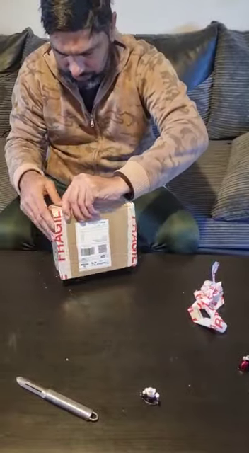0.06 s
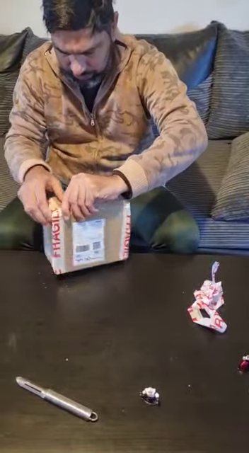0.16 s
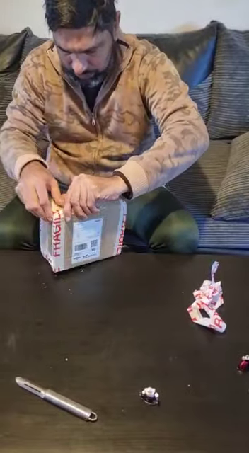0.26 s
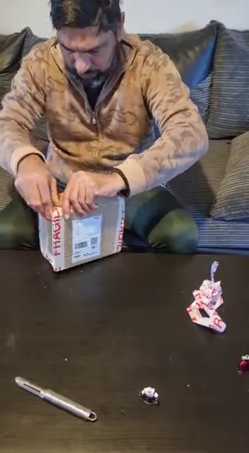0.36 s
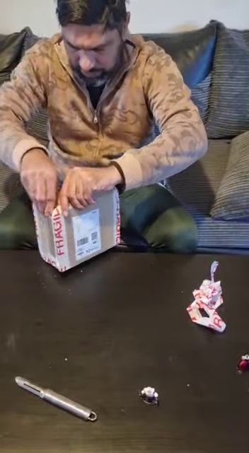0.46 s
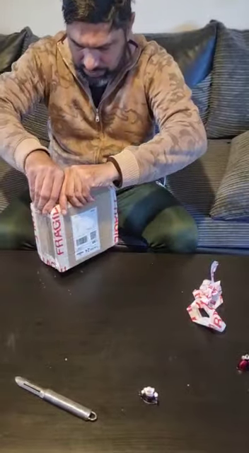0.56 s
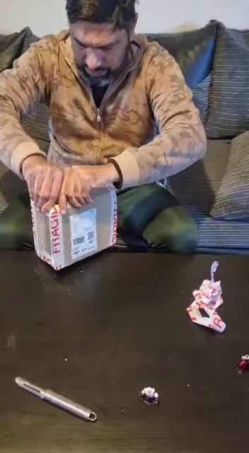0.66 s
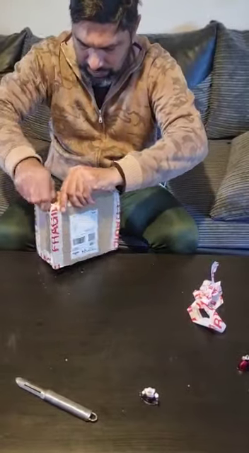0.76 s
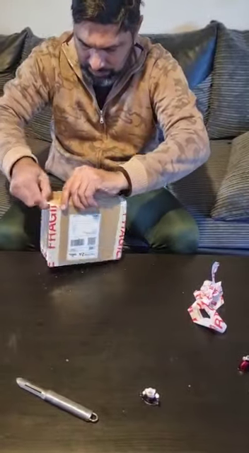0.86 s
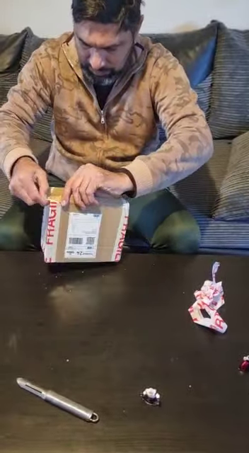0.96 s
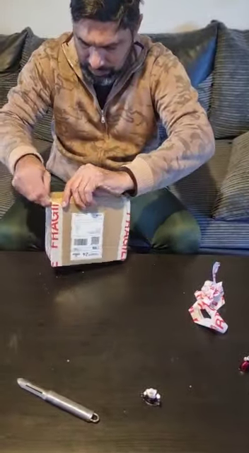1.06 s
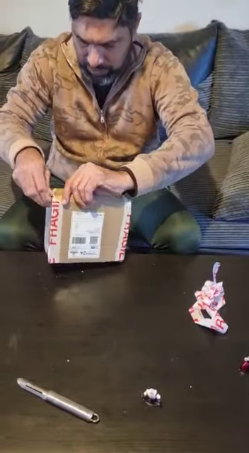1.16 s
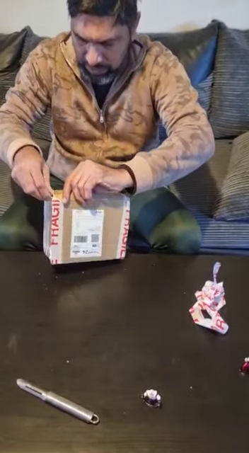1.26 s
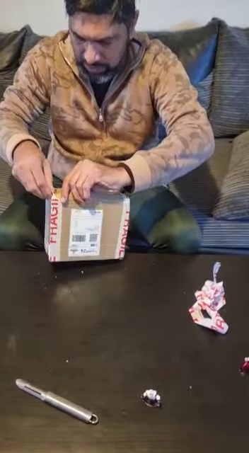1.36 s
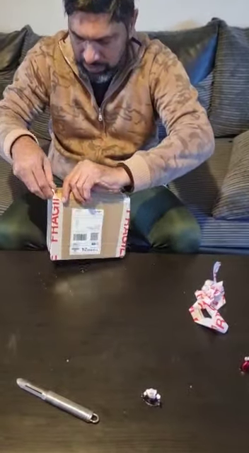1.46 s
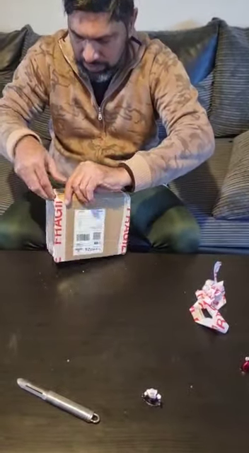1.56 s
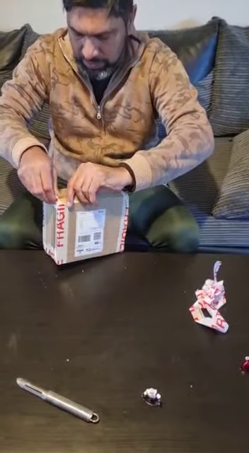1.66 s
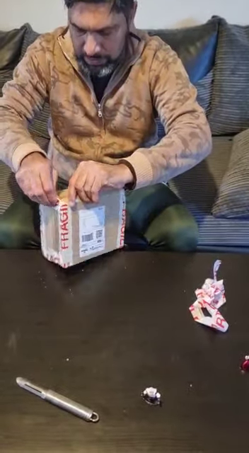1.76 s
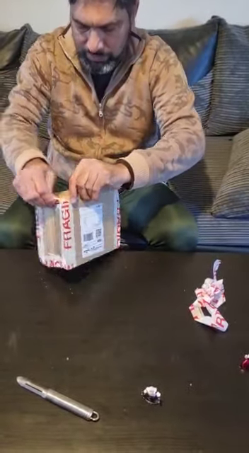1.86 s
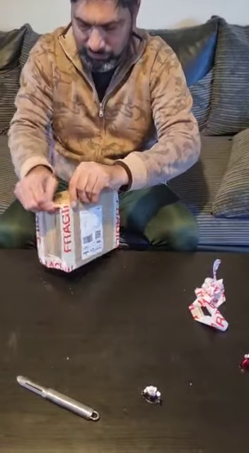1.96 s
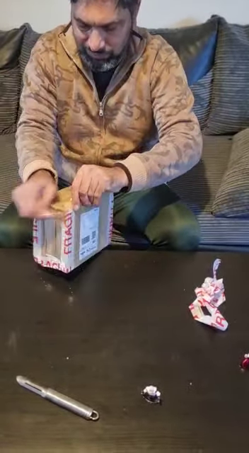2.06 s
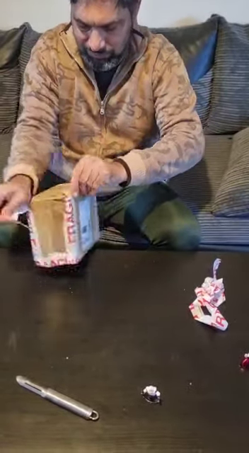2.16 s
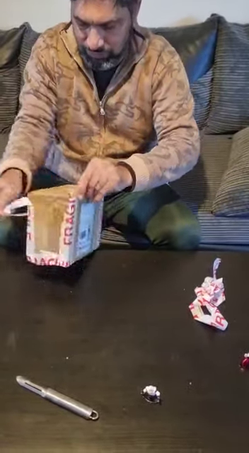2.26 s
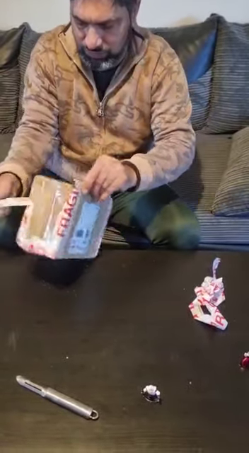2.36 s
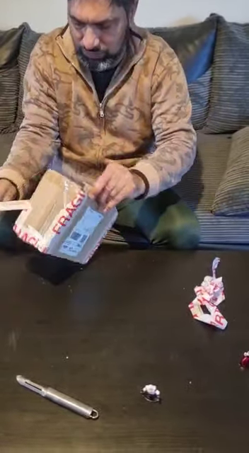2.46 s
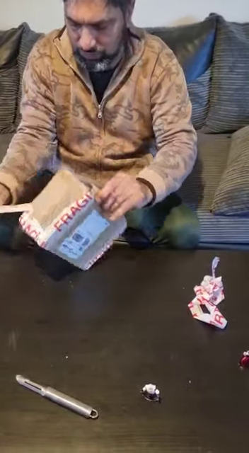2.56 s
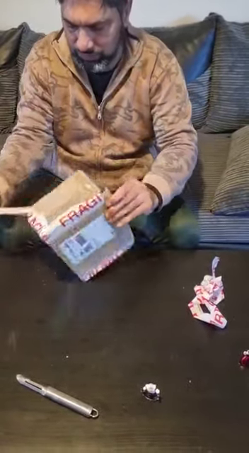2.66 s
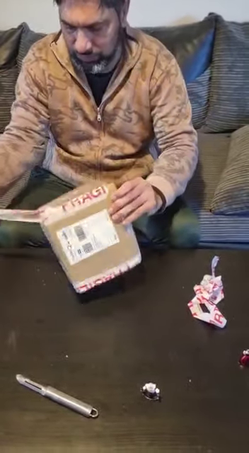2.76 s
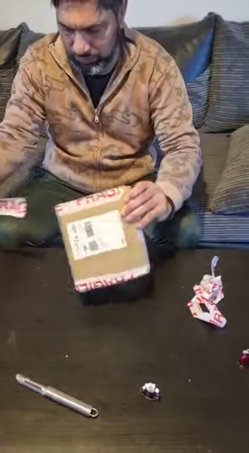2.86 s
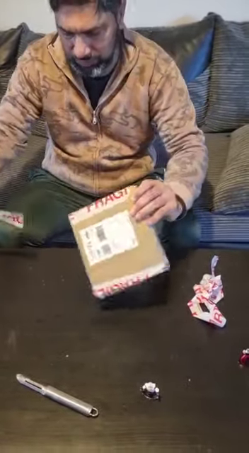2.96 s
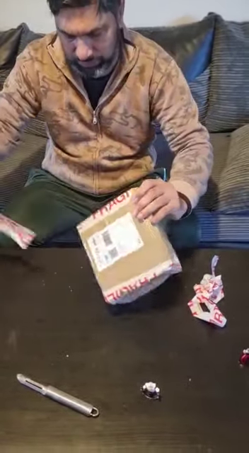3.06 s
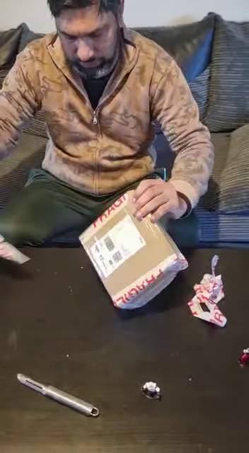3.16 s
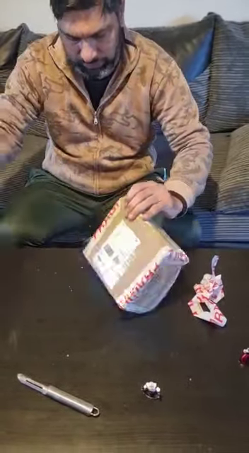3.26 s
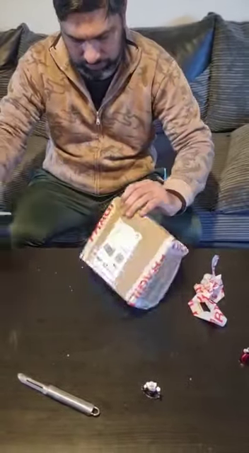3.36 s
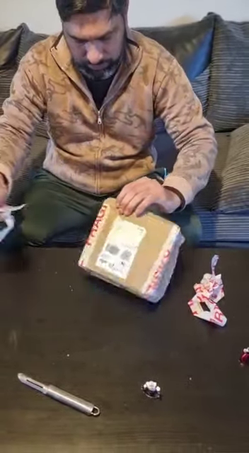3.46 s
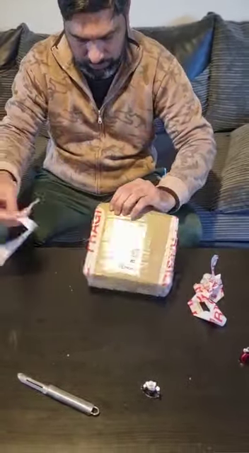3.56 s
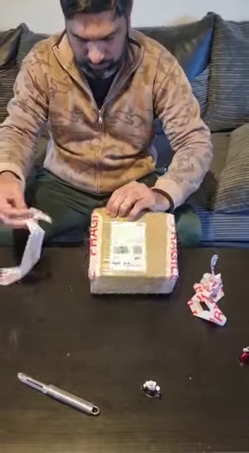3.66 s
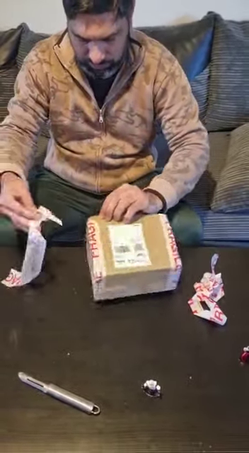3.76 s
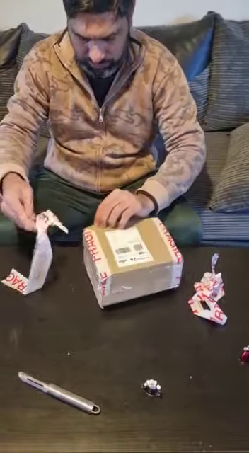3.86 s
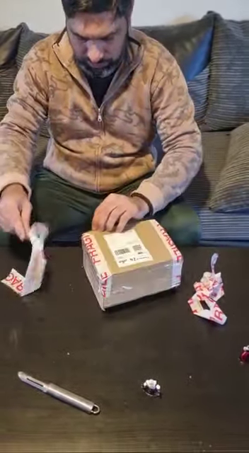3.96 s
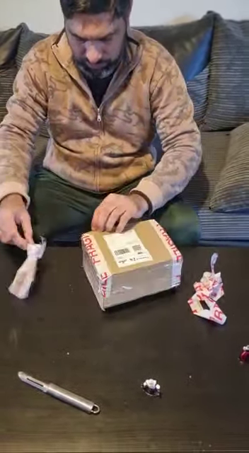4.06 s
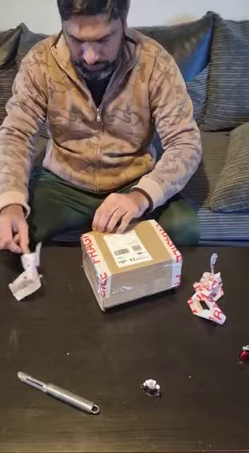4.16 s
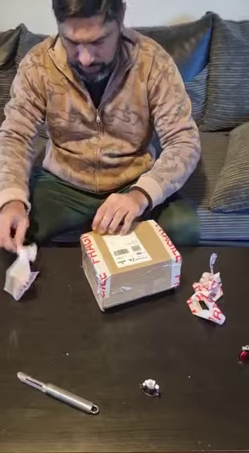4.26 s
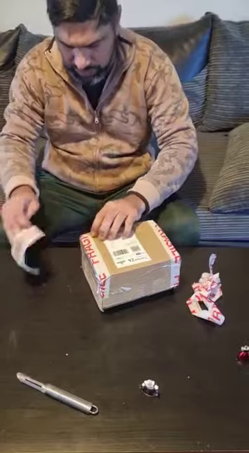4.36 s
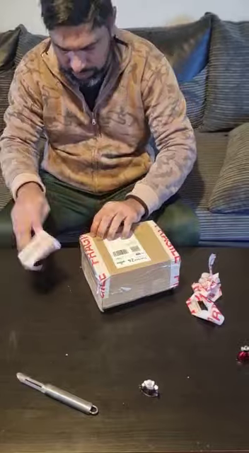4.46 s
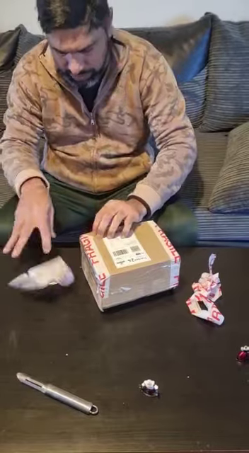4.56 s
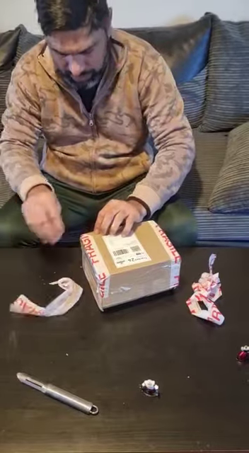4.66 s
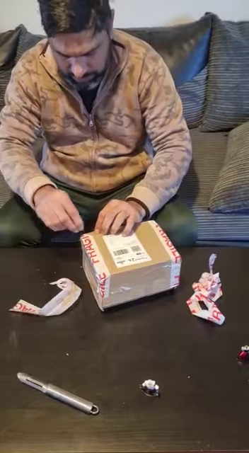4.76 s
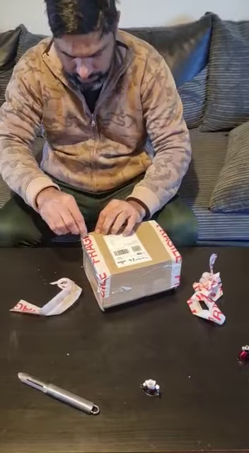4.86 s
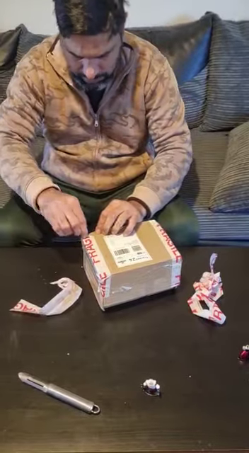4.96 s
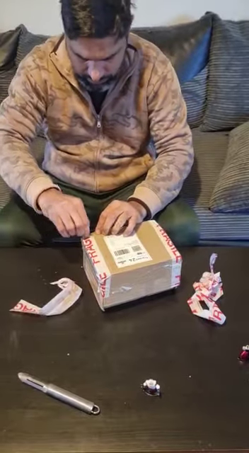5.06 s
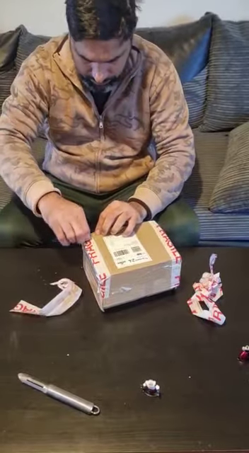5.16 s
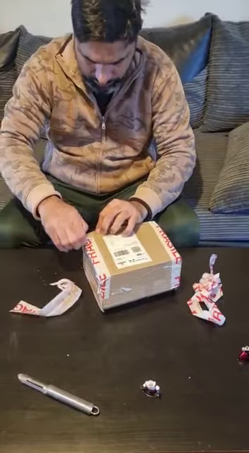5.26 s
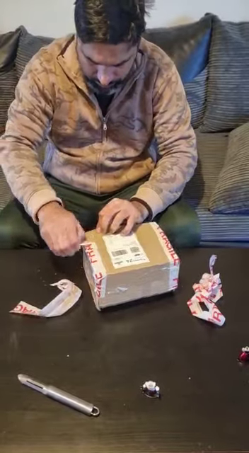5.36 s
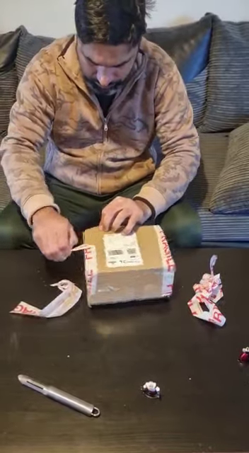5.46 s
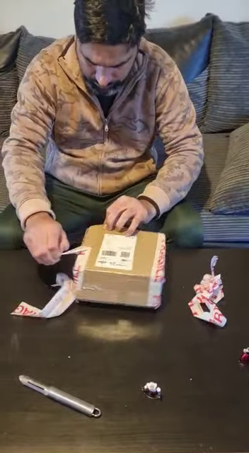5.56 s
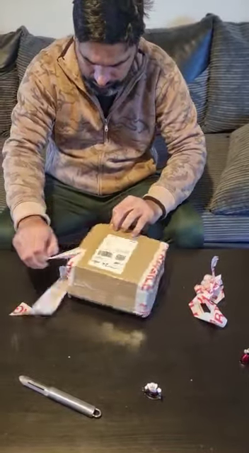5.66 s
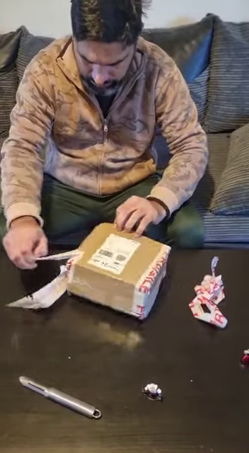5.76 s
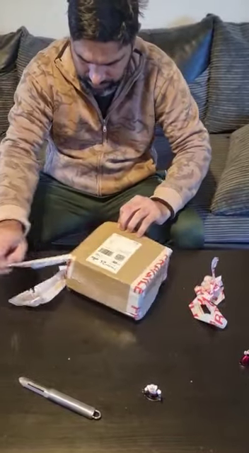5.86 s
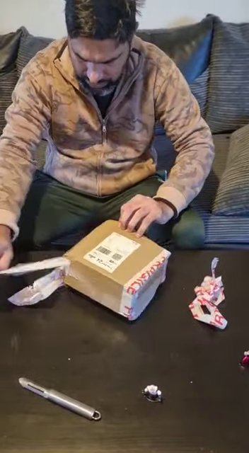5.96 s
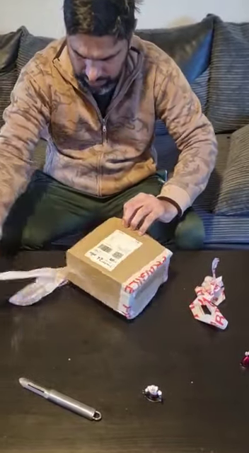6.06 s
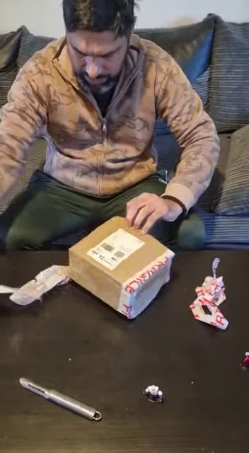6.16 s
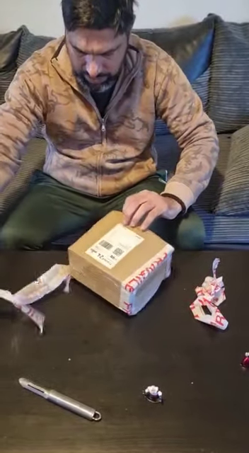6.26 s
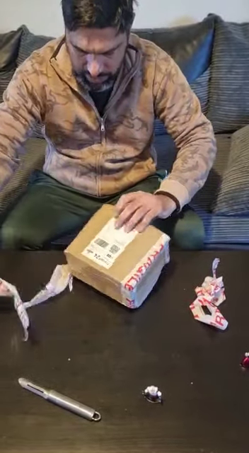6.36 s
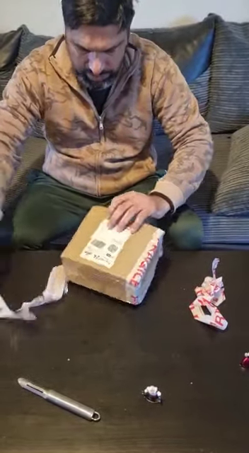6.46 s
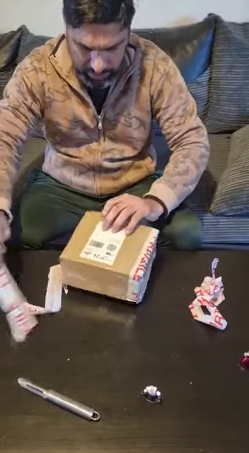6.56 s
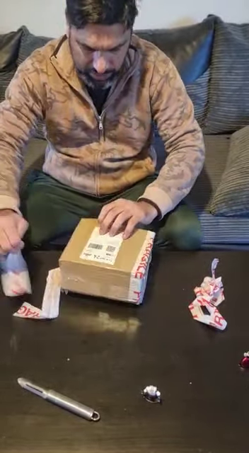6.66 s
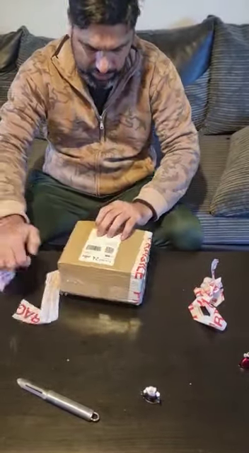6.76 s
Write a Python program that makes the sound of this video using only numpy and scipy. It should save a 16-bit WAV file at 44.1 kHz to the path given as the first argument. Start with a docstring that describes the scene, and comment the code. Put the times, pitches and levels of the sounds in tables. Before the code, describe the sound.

Close up in a small furnished room, fingers pick at tape on a cardboard box with small snaps and soft knocks. A loud sharp rip follows at two seconds, another near three, then quiet handling, a soft thud on the wooden table and faint pats. Late on, several crackling pulls build to a bright hard rip near six seconds, fading into rustle.

```python
"""Packing tape is picked at, ripped and peeled off a cardboard box: the glue lets go in tiny slips, noise bursts
that crackle in the film and drum the hollow box; snaps and ticks are short puffs, some with a ringing crease.
The box knocks and slides on a wooden table, heard as decaying modes; a hand pats the cardboard, a dull note.
A small furnished room answers with decaying noise over a faint room tone; a phone with two microphone ports,
placed close by, listens."""
import sys
import numpy as np
from scipy import signal
from scipy.fft import rfft, irfft, next_fast_len
from scipy.io import wavfile
from scipy.ndimage import uniform_filter1d, map_coordinates

SR = 44100
rng = np.random.default_rng(int(sys.argv[2]) if len(sys.argv) > 2 else 0)


def log_audio(samples):
    """Write samples as a 16-bit WAV file to the path given in sys.argv[1]."""
    # one column per channel
    frames = np.atleast_2d(samples).T
    # limit to full scale, then quantise
    limited = np.clip(frames, -1, 1)
    pcm = np.round(limited * 32767).astype(np.int16)
    wavfile.write(sys.argv[1], SR, pcm)


N = 300321

# colour of the crackling film: hz, relative level_db
FILM_COLOUR = [(120, -28), (300, -20.5), (500, -14.5), (1300, 1), (2140, 1), (3300, 0.5), (5300, -5),
               (7000, -8.5), (9000, -53)]
# colour of the sizzle in the treble: hz, relative level_db
SIZZLE_COLOUR = [(5000, -9.5), (8300, -15.5), (10500, -7), (13000, -2.5), (16000, 1.5)]
# each pull on the tape, or scuff of a hand: peak_s, rise_s, hold_s, crackle_db, box_db (drumming re crackle),
# sizzle_db (re crackle), box_note_hz, film_note_hz, film_note_db (lift of that note)
PULLS = [(0.126, 0.056, 0.017, -38.5, -9, -18, 508, 1880, 9),
         (0.574, 0.064, 0.11, -34, -1.5, 2.5, 597, 2920, 0),
         (0.771, 0.73, 0.045, -39.5, -6, 3, 764, 3750, 3),
         (0.872, 0.33, 0.11, -46.5, -6.5, 6.5, 865, 4100, 12),
         (1.437, 0.17, 0.028, -50, 2, -15, 635, 1890, 14.5),
         (1.553, 0.17, 0.0083, -43, -28, -7, 600, 1730, 8),
         (1.755, 0.095, 0.064, -44, 3.5, -3.5, 700, 1710, 6.5),
         (1.874, 0.2, 0.021, -42.5, -0.5, -4, 600, 1866, 16.5),
         (2.001, 0.053, 0.098, -41, -6.5, 12, 568, 2500, -2),
         (2.103, 0.024, 0.053, -19, -9.5, 4.5, 538, 3080, 2), (2.33, 1, 0.062, -36, -5, 0, 561, 1900, -2),
         (2.424, 0.39, 0.1, -41.5, 7.5, 1.5, 553, 2470, 6),
         (2.536, 0.33, 0.18, -41, 3, 0.5, 603, 1520, 9.5), (2.7, 0.2, 0.058, -31, -3, 1.5, 626, 2570, -4),
         (2.81, 0.073, 0.0063, -17.5, -2, 5, 885, 3000, -1.5),
         (3.328, 0.29, 0.17, -50, -3, -9, 850, 2120, 8), (3.82, 0.97, 0.24, -56, -2.5, -12, 820, 1930, 10),
         (4.118, 0.42, 0.0057, -51, -8.5, 3.5, 736, 2060, -14),
         (4.348, 0.031, 0.073, -52, -2, 0, 677, 1900, -3), (5.298, 0.038, 0.024, -44, -1, -7, 460, 4440, 9),
         (5.355, .08, 0.072, -53, 6, -13, 480, 2060, 11), (5.453, 0.47, 0.047, -34, -3, -2, 520, 2300, 5.5),
         (5.548, 0.074, 0.054, -26, 0.5, 1.5, 550, 4380, 7),
         (5.633, 0.19, 0.083, -25, -1.5, 2, 390, 4350, 3), (5.764, 0.02, 0.1, -30, -2, 0, 420, 4040, 2),
         (5.812, 0.05, 0.097, -24.5, -4.5, 2, 745, 5250, 7),
         (5.989, 0.023, 0.027, -13.5, -35, -10.5, 986, 2140, 17.5),
         (6.014, 0.083, 0.028, -27, 2.5, 12.5, 1010, 4370, -1.5),
         (6.37, 0.31, 0.0059, -43.5, -18, -1.5, 816, 3980, 5.5),
         (6.551, 0.089, 0.14, -50, -7, -3.5, 758, 4070, 4),
         (6.697, 0.29, 0.017, -44, -5, 0.5, 775, 4100, -3)]


def amp(db):
    """Gain of a level in dB."""
    return 10 ** (np.asarray(db) / 20)


def unit(x):
    """Scaled to rms 1."""
    return x / np.sqrt(np.mean(x ** 2) + 1e-20)


def along(points, hz):
    """Reads a curve of (Hz, value) points on a log frequency axis."""
    f, v = np.transpose(points)
    return np.interp(np.log(hz + 1), np.log(f + 1), v)


def filtered(x, response):
    """x times a complex response of frequency."""
    m = next_fast_len(N + SR // 2)
    return irfft(rfft(x, m) * response(np.fft.rfftfreq(m, 1 / SR)), m)[..., :N]


def coloured(x, points):
    """x through a spectrum of (Hz, dB) points."""
    return filtered(x, lambda hz: amp(along(points, hz)))


def wobble(rate):
    """A smooth random curve, rate knots a second."""
    knots = rng.standard_normal(int(N * rate / SR) + 4)
    return map_coordinates(knots, [np.arange(N) * rate / SR])


def steady(x, s):
    """x divided by its own running rms over s seconds."""
    power = uniform_filter1d(np.mean(np.atleast_2d(x) ** 2, 0), int(s * SR))
    return x / np.sqrt(np.abs(power) + 1e-12)


def pair(alike, wander, lead=0):
    """Noise at the two ports, partly the same; the first leads by a steady and a wandering offset (samples)."""
    a, b = rng.standard_normal((2, N))
    offset = np.round(lead + wander * wobble(3)).astype(int)
    first = a[np.clip(np.arange(N) + offset, 0, N - 1)]
    return np.array([first, alike * a + np.sqrt(1 - alike ** 2) * b])


def bursts(sizes, t60):
    """Each size starts a puff that falls 60 dB in t60 seconds."""
    return signal.lfilter([1], [1, -amp(-60 / (t60 * SR))], sizes)


def room_tone():
    """The air of the room: a steady coloured noise, partly alike at the two ports."""
    # hz, relative level_db
    air = [(25, -13), (100, -12), (310, -2.5), (1000, -9.5), (4000, -18), (8300, -41.5), (13000, -34.5),
           (16000, -43)]
    return amp(-64.5) * unit(coloured(pair(alike=0.53, wander=24), air))


def room(x):
    """Each frequency dies at its own speed; the answer shifts every quarter second as hands and box move."""
    # decay of the room: hz, t60_s
    decay = [(150, 0.04), (1000, 0.14), (5000, 0.21), (14000, 0.089)]
    out, hop, delay = np.zeros((2, N + SR)), SR // 4, 200  # samples
    for start in range(0, N, hop):
        hz, t, z = signal.stft(rng.standard_normal((2, SR // 2)), SR, nperseg=256)
        fade = amp(-60 * t / along(decay, hz)[:, None])
        tail = signal.istft(z * fade, SR, nperseg=256)[1]
        wet = signal.fftconvolve(x[:, start:start + hop], tail / np.linalg.norm(tail[0]), axes=1)
        out[:, start + delay:start + delay + wet.shape[1]] += wet
    return out[:, :N]


def struck(force, vary_db=0):
    """The table top rings with its modes, each building up over about a cycle; the place shifts their balance."""
    # modes of the table top: hz, level_db, t60_s
    modes = [(90.3, -1, 0.14), (170.1, -2.5, 0.15), (191.5, -3, 0.079), (321.6, -6.5, 0.18),
             (596, -1, 0.031)]
    t = np.arange(SR // 2) / SR
    ring = np.zeros(len(t))
    for hz, db, t60 in modes:
        decay = amp(db + vary_db * rng.standard_normal() - 60 * t / t60)
        build_up = 1 - np.exp(-t * hz / 0.56)
        ring += decay * np.sin(2 * np.pi * hz * t) * build_up
    return signal.fftconvolve(force, ring)


def sliding():
    """Friction under the box, an uneven noise, keeps the lowest and the upper modes of the table humming."""
    # the box slides and rocks on the table: time_s, deep_rumble_db, upper_rumble_db
    slides = [(0, -63, -61.5), (0.701, -83, -60), (1.48, -54.5, -58.5), (1.69, -63, -58), (2.03, -58, -47),
              (2.79, -73, -47), (3.03, -75, -76.5), (5.27, -77, -67), (5.65, -84, -33), (6.05, -41.5, -57),
              (6.43, -76, -68)]
    s, deep_db, upper_db = np.transpose(slides)
    friction = rng.standard_normal(N) * amp(3.5 * wobble(11))
    hum = struck(friction)[:N]
    deep = unit(coloured(hum, [(110, 0.5), (135, -28.5)]))
    upper = unit(coloured(hum, [(115, -24.0), (140, -4.5)]))
    t = np.arange(N) / SR
    return amp(np.interp(t, s, deep_db)) * deep + amp(np.interp(t, s, upper_db)) * upper


def knocking():
    """Cardboard lands softly and chatters; a harder landing is a shorter push and rings the higher modes."""
    # the box lands or rocks on the table: start_s, relative level_db, hardness_db (shortens the push)
    landings = [(0.275, -31.5, 3), (0.294, -27.5, -6), (0.836, -41, -2), (0.9, -29.5, -12.5),
                (1.079, -39, 3), (1.27, -44, -3), (1.334, -45, 11), (1.422, -39, -7), (1.887, -36.5, -0.5),
                (2.129, -25.5, 19), (2.335, -36, 32), (2.579, -28, -9), (2.949, -34.5, -10),
                (3.324, -33, -6.5), (3.944, -38.5, -2), (3.968, -21.5, -16), (6.018, -30, -8),
                (6.134, -37.5, -5.5), (6.678, -35.5, -2.5)]
    out, t = np.zeros(N + SR), np.arange(SR // 8) / SR
    for s, db, hard_db in landings:
        u = t / (0.00042 * amp(-hard_db))  # time in units of the push
        push = u * np.exp(-u)
        contacts = (rng.random(len(t)) < 90 / SR) * rng.standard_normal(len(t))  # about 90 a second
        chatter = contacts * .4 * amp(-60 * t / .12)
        chatter[0] = 1  # the landing itself
        force = signal.fftconvolve(chatter, push / push.sum())[:len(t)]
        ring = struck(force, vary_db=2.5)
        out[round(s * SR):][:len(ring)] += amp(db + 4.0) * ring
    return out[:N]


def patting():
    """Each pat of a hand is a short dull note of the cardboard wall."""
    # start_s, relative level_db
    pats = [(4.203, -45), (4.232, -50), (4.26, -42), (6.285, -47.5)]
    out, t = np.zeros(N + SR), np.arange(SR // 8) / SR
    for s, db in pats:
        out[round(s * SR):][:len(t)] += amp(db - 0.5 - 60 * t / 0.1) * np.sin(2 * np.pi * 215 * t)
    return out[:N]


def drummed(x):
    """x through the resonances of the walls and air of the box, with alternating sign."""
    # centre_hz, width_hz, level_db
    resonances = [(302.3, 56, -4.5), (552.6, 139, 2.5), (697, 594, -2.5), (1073, 240, 0)]

    def response(f):
        total = 0
        for k, (centre, width, db) in enumerate(resonances):
            damping = 1j * f * width
            total = total + (-1) ** k * amp(db) * damping / (centre * centre - f * f + damping)
        return total
    return filtered(x, response)


def ticking():
    """A crease of the film flips: a very short bright puff with little body below the treble."""
    # start_s, relative level_db
    flips = [(0.3277, -36), (0.794, -17), (1.1672, -33), (1.383, -30), (1.66, -36), (1.9546, -30),
             (1.9658, -31), (1.9846, -24), (2.0073, -9.5), (2.0644, -11), (2.2862, -19), (3.19, -37),
             (3.2904, -39), (3.434, -45), (3.5732, -33), (3.9119, -41), (3.964, -35), (3.9764, -34),
             (4.0483, -33.5), (4.224, -48), (4.4096, -30.5), (4.683, -52), (4.7955, -59), (4.814, -51),
             (5.058, -40), (5.1022, -35), (5.1795, -52), (5.7637, -15), (5.8006, -19), (6.5804, -32),
             (6.7006, -29)]
    out, t = np.zeros((2, N + SR)), np.arange(SR // 60) / SR
    for s, db in flips:
        noise = rng.standard_normal(len(t)) + rng.standard_normal((2, len(t)))  # shared + own of each port
        puff = noise * amp(-60 * t / .009) * (1 - np.exp(-t / .0005))
        puff = puff / np.linalg.norm(puff, axis=1, keepdims=True)
        out[:, round(s * SR):][:, :len(t)] += amp(db + 14) * puff
    return coloured(coloured(out[:, :N], SIZZLE_COLOUR), [(1500, -20), (3500, 8), (9000, 0)])


def snapping():
    """Each snap is a few milliseconds of crack, a ring of the crease and a push on the box."""
    # single snaps of glue and creased film: start_s, relative level_db, box_db (share), crease_hz, sizzle_db (share)
    snaps = [(0.2721, -23.5, 14, 1880, -24), (0.536, -16, 16, 1090, -6.5), (0.5729, -8.5, 13, 1190, -14),
             (0.581, -7, 8, 1070, -10.5), (0.598, -18.5, 22, 890, -7), (0.611, -10.5, 10, 3000, -22),
             (0.6369, -8, -23, 3580, -39), (0.6783, -6.5, -31, 3100, -20), (0.751, -5.5, -33, 3610, -13.5),
             (0.8697, -13, -5, 1240, -9.5), (1.067, -24.5, -3, 2300, -39), (1.3374, -26.5, -42, 3330, -4.5),
             (1.5261, -22.5, -13, 3140, -10.5), (1.538, -17, 14, 1650, -27), (1.865, -21, -12, 1480, -41),
             (1.94, -31, -18, 1220, -12), (2.09, -10, -26, 3060, -4), (2.1045, 1, -23, 3260, -12),
             (2.134, -5.5, 18, 2840, -17), (2.328, -12.5, 12.5, 1860, -12.5), (2.777, -9, 6, 1190, -32),
             (3.216, -34.5, -20, 2770, -10), (3.3265, -20.5, 4, 2080, -22), (3.477, -32, -23, 3270, -22),
             (3.7293, -31.5, -19, 1960, -5.5), (3.9451, -27.5, 17, 1150, -30),
             (4.1124, -27, -57, 3670, -7.5), (4.351, -27.5, -45, 3460, -11.5),
             (4.512, -32.5, -41, 3880, -13), (4.7104, -33.5, -25.5, 2050, -41),
             (4.9671, -28, 10.5, 1700, -46), (5.0471, -33, 13.5, 2670, -22), (5.544, -21, 5, 1120, -8),
             (5.986, -6, -37, 2180, -19), (6.639, -24, -18, 3800, -16)]
    crack, fizz, ring, push = np.zeros((4, 2, N + SR))
    t = np.arange(SR // 40) / SR
    quarter_cycle = np.array([[0], [1 / 4]])  # phase between the ports
    for s, db, box_db, hz, sizzle_db in snaps:
        shared, own = rng.standard_normal(len(t)), rng.standard_normal((2, len(t)))
        puff = (shared + 1.5 * own) * amp(-60 * t / .008) * (1 - np.exp(-t / .0007))
        puff = puff / np.linalg.norm(puff, axis=1, keepdims=True)
        note = np.sin(2 * np.pi * (hz * t + rng.random() + quarter_cycle))
        span = slice(round(s * SR), round(s * SR) + len(t))
        crack[:, span] += amp(db + 12.5) * puff
        fizz[:, span] += amp(db + sizzle_db + 23.0) * puff
        ring[:, span] += amp(db - 3 - 60 * t / 0.009) * (1 - np.exp(-t / .0005)) * note
        push[:, span] += amp(db + box_db + 13.0) * puff
    bright = coloured(crack[:, :N], FILM_COLOUR) + coloured(fizz[:, :N], SIZZLE_COLOUR)
    return bright + ring[:, :N] + drummed(push[:, :N])


def efforts():
    """Gains of crackle, drumming and sizzle: each pull rises, sags while held and lets go, over the rustle."""
    # quiet rustle of hands on tape and box between pulls: time_s, crackle_db, box_db (re crackle),
    # sizzle_db (re crackle)
    rustle = [(0, -50.5, -5, -9), (.07, -59.5, -1.5, -6), (.4, -61.5, 5.5, -13), (1.05, -55, -4.5, 1.5),
              (1.65, -59, 1.5, -5.5), (2.9, -51, -3, -18), (3.08, -60.5, -4.5, -3.5), (3.65, -53, -2, 4.5),
              (3.9, -64, 5, -19), (4.22, -64, -2, -14), (4.502, -65.5, 1, -4.5), (4.9, -77, -4, -13),
              (5.199, -77, 16, 0), (6.2, -57, -1.5, -19), (6.5, -61.5, -1, -55), (6.81, -59.5, -0.5, -11)]
    rise_db = 52  # climb over the rise
    sag_db_per_s, release_db_per_s = 31, 402  # loss while held, loss after
    linger_db, linger_db_per_s = -13, 153.5  # the slack strip crackles on, weaker and dying slower
    t = np.arange(0, N, 64) / SR
    s, db, box_db, sizzle_db = np.transpose(rustle)
    power = amp([np.interp(t, s, db + share) for share in (0, box_db, sizzle_db)]) ** 2
    for s, rise, hold, db, box_db, sizzle_db, *_ in PULLS:
        since = t - s
        shape_db = rise_db * np.minimum(since, 0) / rise - sag_db_per_s * np.clip(since, 0, hold)
        after = np.maximum(since - hold, 0)
        shape_db = shape_db + np.maximum(-release_db_per_s * after, linger_db - linger_db_per_s * after)
        power = power + amp(shape_db + db + np.array([[0], [box_db], [sizzle_db]])) ** 2
    return [np.interp(np.arange(N) / SR, t, np.sqrt(p)) for p in power]


def emphasis(x, centre_hz, octaves, lift_db, patchy_db):
    """Lifts the band of each pull's note until the next takes over; brief patches of colour come and go."""
    fade_s, wander_oct = .3, .06  # a note loses its edge after the peak and drifts as the strip moves
    hz, t, z = signal.stft(x, SR, nperseg=1024)
    peaks = np.transpose(PULLS)[0]
    pull = np.maximum(np.searchsorted(peaks - .03, t) - 1, 0)  # a note sets in 30 ms before its peak
    drift = wander_oct * wobble(9)[np.minimum(t * SR, N - 1).astype(int)]
    apart = (np.log2((hz[:, None] + 1) / centre_hz[pull]) - drift) / octaves
    fade = np.exp(-np.maximum(t - peaks[pull], 0) / fade_s)
    strength_db = np.broadcast_to(lift_db, peaks.shape)[pull] * fade
    patches = uniform_filter1d(rng.standard_normal(z.shape[1:]), size=12, axis=0)
    patches = uniform_filter1d(patches, size=4, axis=1)
    lift = amp(strength_db * np.exp(-apart ** 2) + patchy_db * unit(patches))
    return steady(signal.istft(z * lift, SR, nperseg=1024)[1][:, :N], 0.092)


def peeling():
    """Slips of the glue come thick and uneven; the film crackles and sizzles and the box drums."""
    crackle, drum, fizz = efforts()
    *_, box_hz, film_hz, note_db = np.transpose(PULLS)
    chance, size = rng.random(N), np.minimum(rng.exponential(size=N), 3)
    slips = (chance < 900 / SR) * amp(1.5 * size)  # about 900 a second, many small, few large
    uneven = bursts(slips, 0.0081) * amp(8.8 * wobble(28))
    grip = steady(uneven + .5, 0.049)

    film_noise = coloured(pair(alike=0.86, wander=25), FILM_COLOUR)
    film = grip * emphasis(film_noise, film_hz, octaves=0.33, lift_db=note_db, patchy_db=0.78)

    creases = bursts((chance > 1 - 12 / SR) * amp(3 * size), .006)  # now and then a crease flips
    sizzle = unit(coloured((grip + 0.67 * creases) * pair(alike=0.96, wander=25), SIZZLE_COLOUR))

    box_noise = pair(alike=0.81, wander=6.4, lead=19.6)
    box_force = grip * emphasis(box_noise, box_hz, octaves=0.2, lift_db=8.5, patchy_db=0.0)
    box = unit(drummed(box_force))
    return crackle * film + drum * box + fizz * sizzle


def scene():
    """Tape and box near the phone, the room's answer to them, the table and the room tone."""
    tape = peeling() + snapping() + ticking() + patting()
    above_bass = coloured(tape, [(200, -19.0), (500, 0.5)])  # the small room spreads little bass between the ports
    table = knocking() + sliding()
    return tape + table + amp(-3.5) * room(above_bass) + room_tone()


def record(dry):
    """The two ports differ in colour and lose the deep bass; peaks are rounded; a band limit cuts the top."""
    # difference between the ports: hz, left_minus_right_db
    ports = [(60, -1.5), (380, -2.5), (950, -1), (2380, -3.5), (5000, -3), (8500, 11), (12000, -3.5)]
    top_hz = 15850  # nothing is kept above

    def port_response(hz):
        low_cut = (1j * hz / (48 + 1j * hz)) ** 3
        return amp(np.array([[.5], [-.5]]) * along(ports, hz)) * low_cut

    def band_limit(hz):
        return np.sin(np.pi / 2 * np.clip((top_hz - hz) / 300, 0, 1)) ** 2

    heard = filtered(dry, port_response)
    rounded = heard / (1 + np.abs(heard / .95) ** 4) ** (1 / 4)
    return filtered(rounded, band_limit)


dry = scene()
out = record(dry)
log_audio(out)
```